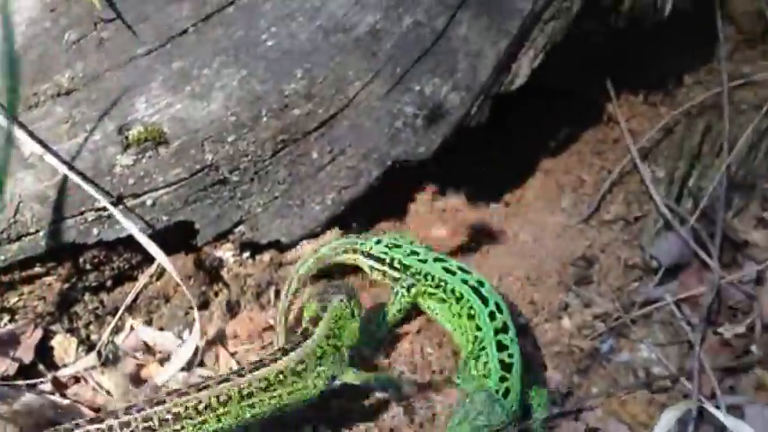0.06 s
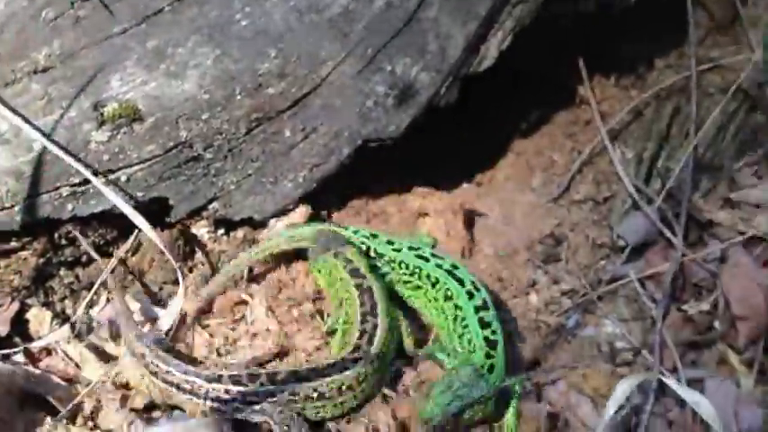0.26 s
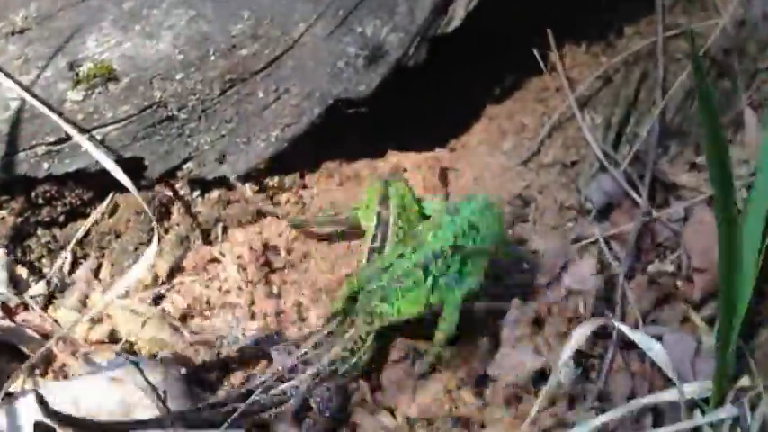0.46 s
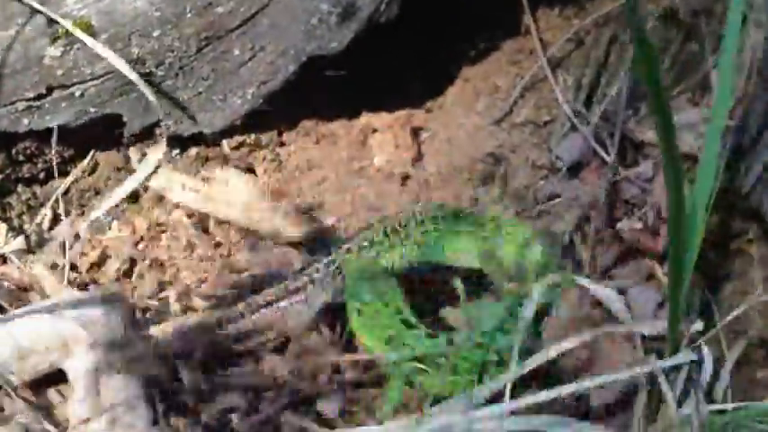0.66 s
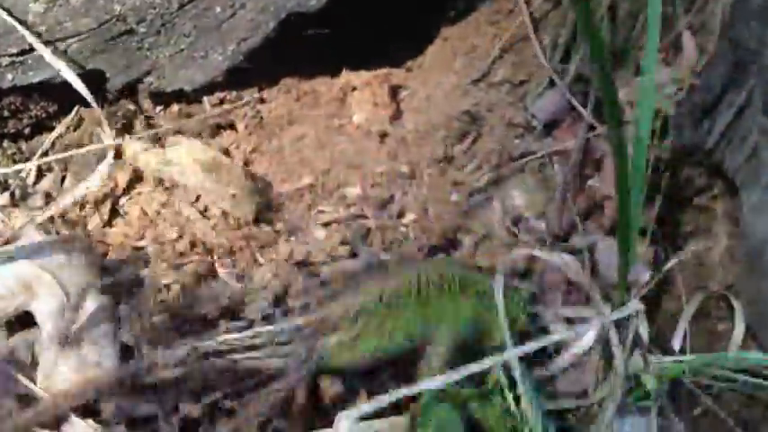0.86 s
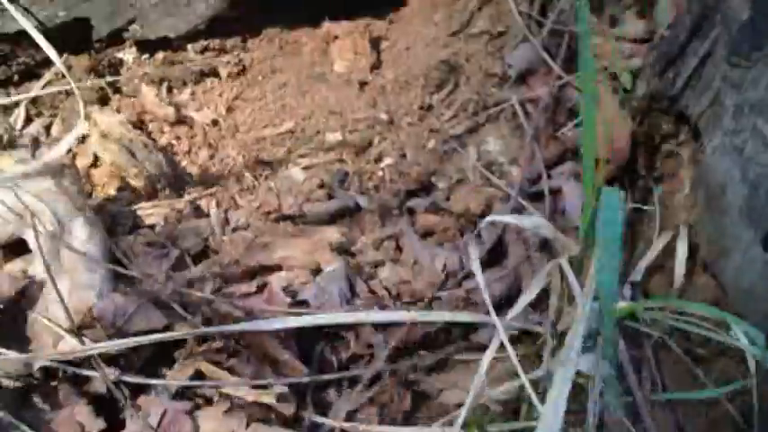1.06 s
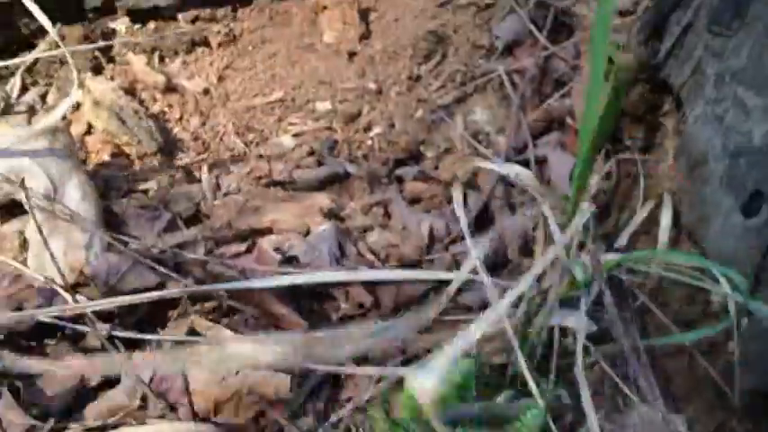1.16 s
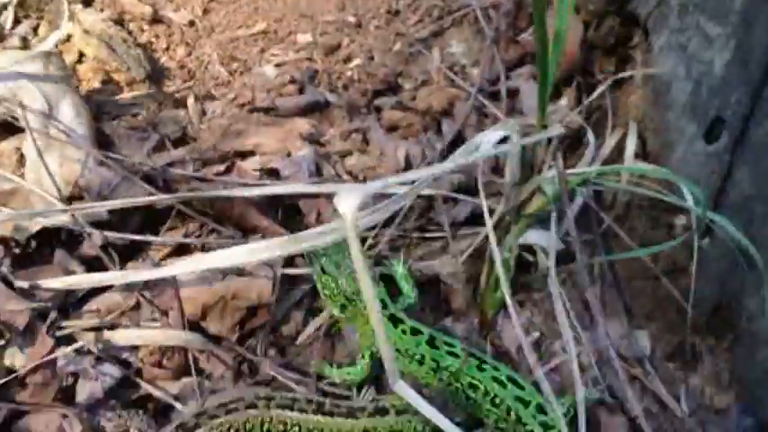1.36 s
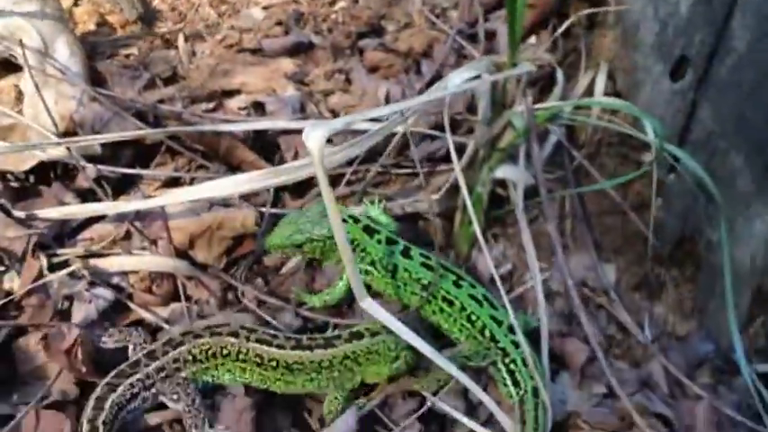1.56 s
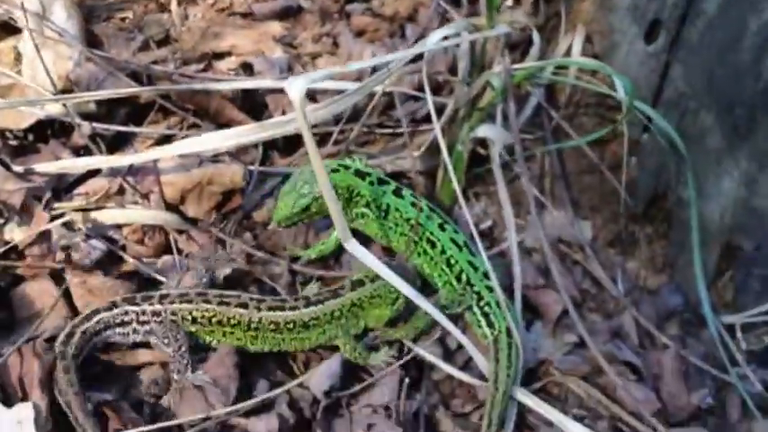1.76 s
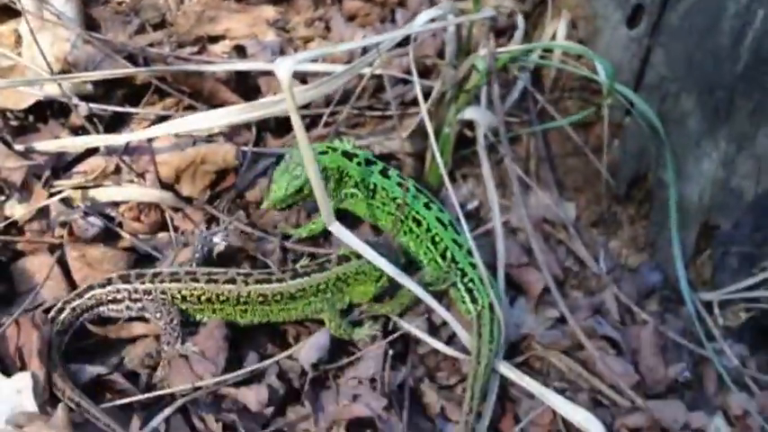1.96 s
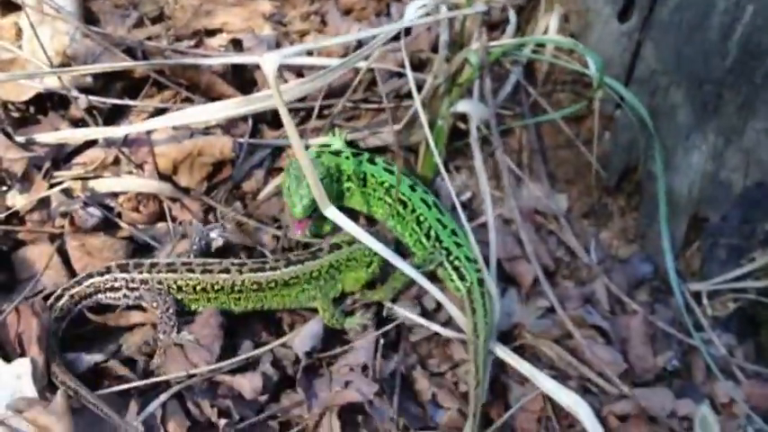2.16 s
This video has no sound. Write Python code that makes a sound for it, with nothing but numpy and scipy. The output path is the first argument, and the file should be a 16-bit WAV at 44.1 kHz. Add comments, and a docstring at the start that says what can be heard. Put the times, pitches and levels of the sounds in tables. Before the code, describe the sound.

Dry leaves rustle and crackle close by as two lizards scuffle in a quiet forest. Short, light shuffles fill the first 0.6 seconds. From about 0.6 to 1.1 seconds comes the loudest thrashing, a crisp, hissy crumpling with small snaps of leaves and stalks. Weaker rustles follow until 1.5 seconds, then only faint stirring and a few tiny ticks up to about 2.2 seconds.

```python
"""Dry leaf litter beside a log: two lizards scuffle close by, in mono, over still forest air.
They shuffle, thrash for half a second, then settle. Each kick crumples leaves (a spray of tiny
fractures over a sliding hiss) and scuffs the soil. Now and then a brittle leaf or stalk snaps;
once a body lands with a faint thud. Log and ground scatter a short echo."""
import sys
import numpy as np
from scipy import signal
from scipy.fft import rfft, irfft, next_fast_len
from scipy.io import wavfile
from scipy.ndimage import uniform_filter1d, map_coordinates

SR = 44100
rng = np.random.default_rng(int(sys.argv[2]) if len(sys.argv) > 2 else 0)


def generate_wav(signal):
    """Clip the signal to [-1, 1] and save it as 16-bit WAV at the path in sys.argv[1]."""
    frames = np.transpose(np.atleast_2d(signal))
    scaled = np.clip(frames, -1, 1) * 32767
    pcm = np.round(scaled).astype(np.int16)
    wavfile.write(sys.argv[1], SR, pcm)


N = 97020

# dry leaf spectrum (frequency [Hz], gain [dB])
LEAF_SPECTRUM = [(300, -46), (1200, -14.5), (2300, -12.5), (2750, -7.5), (3200, -4.5), (4100, -7),
                 (4800, -3), (5200, -4.5), (6300, -6), (7300, 1), (8500, -5), (9300, -.5), (10300, -6.5),
                 (11300, 0), (12500, -5.5), (13400, -3), (14200, -10.5), (15000, -23)]
# scuffed soil spectrum (frequency [Hz], gain [dB])
SOIL_SPECTRUM = [(25, -31), (70, -28.5), (130, -19.5), (300, -5.5), (600, -1), (1050, 2.5), (1900, -3),
                 (3000, -21), (8000, -22)]


def rustle():
    """Leaves crackle and slide in clumps; hard crushing merges fractures into hiss. Soil scuffs below."""
    # top treble (time [s], gain [dB])
    treble_curve = [(0, -5), (.45, -4.5), (.7, 1.5), (1, 1.5), (1.45, 1), (1.8, -4.5), (2.2, 3.5)]
    crackle_db, hiss_db, scuff_db = -2.5, -2, -18  # relative to the movement
    full_crush_db, max_merged_share, treble_hz = -27, .45, 8600
    on_leaves, on_soil = movement()
    clumps = unit(amp(1.24 * wobble(knots_per_s=190)))
    merged_share = max_merged_share * np.minimum(on_leaves / amp(full_crush_db), 1)
    hiss_gain = np.sqrt(amp(hiss_db) ** 2 + merged_share * amp(crackle_db) ** 2)
    hiss = hiss_gain * unit(coloured(rng.standard_normal(N), LEAF_SPECTRUM))
    crackle = amp(crackle_db) * np.sqrt(1 - merged_share) * crumple(LEAF_SPECTRUM)
    leaves = crackle + hiss
    treble = signal.sosfiltfilt(signal.butter(2, treble_hz, "high", fs=SR, output="sos"), leaves)
    leaves += (gain_curve(treble_curve) - 1) * treble
    scuff = amp(scuff_db) * crumple(SOIL_SPECTRUM)
    return clumps * (on_leaves * leaves + on_soil * scuff)


def movement():
    """Force envelopes on leaves and soil: stirring and kicks, summed in power."""
    # steady stirring (time [s], level [dB])
    stirring = [(0, -43), (.16, -44.5), (.195, -47), (.225, -40.5), (.27, -46.5), (.32, -51.5), (.41, -41),
                (.5, -43), (.56, -47.5), (.63, -42), (.76, -33.5), (.89, -35.5), (1.04, -31.5), (1.22, -49),
                (1.37, -40.5), (1.51, -56), (1.58, -55.5), (1.63, -59), (1.67, -53.5), (1.85, -51.5),
                (1.93, -64), (2.05, -68.5), (2.13, -57), (2.2, -65.5)]
    # kicks and tail sweeps (peak time [s], level [dB], rise [s], fade [s], soil weight [dB])
    kicks = [(.047, -30.5, 0.0016, 0.0063, 5.5), (0.093, -34.5, 0.0078, .005, -0.5),
             (.147, -36.5, .01, 0.0071, -10), (0.23, -34.5, 0.0085, 0.03, 2.5),
             (.255, -34.5, .006, 0.011, 3.5), (0.426, -31.5, 0.013, 0.028, -3.5),
             (0.574, -37, 0.0028, 0.012, -15), (.596, -37, 0.0063, 0.019, 1),
             (.640, -32.5, 0.0096, 0.039, -2), (.664, -27, 0.0099, 0.042, 0.5),
             (0.716, -24.5, 0.014, 0.025, -4.5), (0.739, -24.5, .01, .005, -5),
             (.826, -21.5, 0.0096, 0.0086, 1), (0.846, -29, 0.013, 0.015, 0.5),
             (.918, -31.5, 0.0077, 0.0039, 6), (0.938, -30, 0.01, 0.035, -4), (0.988, -28, 0.021, 0.027, 1),
             (1.039, -33, 0.021, .018, -4), (1.098, -28, 0.0078, 0.037, -6), (1.192, -41, 0.0076, .007, 5),
             (1.238, -37.5, .005, 0.017, 0.5), (1.255, -34.5, 0.017, 0.051, -1),
             (1.395, -39.5, 0.018, 0.028, -1.5), (1.473, -43.5, 0.006, 0.012, -16),
             (1.768, -51.5, 0.022, 0.035, 2), (1.826, -53, 0.02, 0.039, 6),
             (1.961, -50.5, 0.0044, 0.014, -7), (2.151, -50, .001, 0.0027, 6.5)]
    t = np.arange(N) / SR
    leaf_power = gain_curve(stirring) ** 2
    soil_power = leaf_power.copy()
    for peak_s, level_db, rise_s, fade_s, soil_db in kicks:
        swell = np.exp(-(np.minimum(t - peak_s, 0) / rise_s) ** 2)
        fade = np.exp(-np.maximum(t - peak_s, 0) / fade_s)
        kick = amp(level_db) * swell * fade
        leaf_power += kick ** 2
        soil_power += (kick * amp(soil_db)) ** 2
    return np.sqrt(leaf_power), np.sqrt(soil_power)


def crumple(spectrum):
    """A spray of fractures, many small and a few large, levelled to even power."""
    fractures_per_s, spread_db, window_s = 2200, 6, .015
    count = int(fractures_per_s * N / SR)
    times_s = rng.random(count) * N / SR
    peaks = amp(spread_db * np.minimum(rng.standard_normal(count), 2))
    ring_hz = rng.uniform(2435, 13600, count)
    grains = fractures(times_s, peaks, ring_hz, crack_s=.0004, ring_s=.00085, ring_gain=.59, samples=256)
    spray = coloured(grains, spectrum)
    window = int(window_s * SR)
    power = uniform_filter1d(uniform_filter1d(spray ** 2, window), window)
    return spray / np.sqrt(np.abs(power) + 1e-12)


def fractures(times_s, peaks, ring_hz, crack_s, ring_s, ring_gain, samples):
    """Each fracture: a sharp crack and a brief ring at its leaf's pitch, both decaying exponentially."""
    t = np.arange(samples) / SR
    cracks = rng.standard_normal((len(times_s), samples)) * np.exp(-t / crack_s)
    rings = ring_gain * np.sin(2 * np.pi * ring_hz[:, None] * t) * np.exp(-t / ring_s)
    grains = cracks + rings
    grains *= peaks[:, None] / np.abs(grains).max(axis=1, keepdims=True)
    indices = np.round(times_s * SR).astype(int)[:, None] + np.arange(samples)
    return np.bincount(indices.ravel(), grains.ravel(), N)[:N]


def snaps():
    """Single leaves and stalks break and knock the soil; larger, lower pieces ring longer and stronger."""
    # breaks (time [s], relative level [dB], ring [Hz])
    breaks = [(.046, -23, 3700), (.091, -17, 8160), (.1702, -21.5, 7000), (.2255, -21, 3900),
              (.252, -19, 7800), (.422, -39, 7000), (.4785, -22, 5500), (.527, -24, 8750),
              (.571, -24, 7400), (.6405, -20, 4900), (.690, -10, 4790), (.7392, -6, 9300),
              (.8255, -13, 7350), (.9495, -8, 7800), (.9935, -1.5, 11800), (1.098, -21, 9250),
              (1.172, -24, 7600), (1.238, -25, 13100), (1.3097, -15, 9300), (1.473, -20.5, 11900),
              (1.530, -33, 9300), (1.602, -33.5, 9400), (1.731, -30, 8100), (1.7652, -28, 9400),
              (1.779, -27, 7650), (1.959, -32, 8100), (2.1505, -30, 11500), (2.1525, -30, 11100),
              (2.1595, -34, 11600)]
    times_s, level_db, ring_hz = np.transpose(breaks)
    decay_cycles, reference_hz, knock_db = 10.7, 7450, -11
    ring_s = decay_cycles / ring_hz[:, None]
    ring_gain = .7 * (reference_hz / ring_hz[:, None]) ** .75
    grains = fractures(times_s, amp(level_db + .5), ring_hz,
                       crack_s=.00048, ring_s=ring_s, ring_gain=ring_gain, samples=512)
    return coloured(grains, LEAF_SPECTRUM) + amp(knock_db) * coloured(grains, SOIL_SPECTRUM)


def thud():
    """A light body lands on soft ground: one damped low tone."""
    onset_s, pitch_hz, level_db, decay_s = .821, 185, -52, .011
    age_s = np.maximum(np.arange(N) / SR - onset_s, 0)
    return amp(level_db) * np.sin(2 * np.pi * pitch_hz * age_s) * np.exp(-age_s / decay_s)


def echo(x):
    """Short diffuse scatter from log and ground."""
    level_db, t60_s, rise_s = -13.5, .058, .0021
    t = np.arange(SR // 3) / SR
    tail = rng.standard_normal(len(t)) * amp(-60 * t / t60_s) * (1 - np.exp(-t / rise_s))
    return amp(level_db) * signal.fftconvolve(x, tail / np.linalg.norm(tail))[:N]


def forest_air():
    """Still air: faint, steady, dark noise."""
    # air spectrum (frequency [Hz], gain [dB])
    air_spectrum = [(25, -39), (55, -15), (110, -4.5), (190, 5.5), (330, -3), (750, -0.5), (1500, -4.5),
                    (5000, -16.5), (14000, -36)]
    rms_db = -69.5
    return amp(rms_db) * unit(coloured(rng.standard_normal(N), air_spectrum))


def amp(db):
    """Decibels to gain."""
    return 10 ** (np.asarray(db) / 20)


def gain_curve(points):
    """Gain per sample through (time [s], level [dB]) points."""
    return amp(np.interp(np.arange(N) / SR, *np.transpose(points)))


def unit(x):
    """Scale to rms 1."""
    return x / np.sqrt(np.mean(x ** 2) + 1e-20)


def wobble(knots_per_s):
    """Smooth random curve."""
    return map_coordinates(rng.standard_normal(4096), [np.arange(N) * knots_per_s / SR], mode="wrap")


def coloured(x, spectrum):
    """Minimum-phase filter through (frequency [Hz], gain [dB]) points."""
    n_fft = 2 * next_fast_len(N // 2 + 4096)
    hz, db = np.transpose(spectrum)
    bin_hz = np.fft.rfftfreq(n_fft, 1 / SR)
    gain = amp(np.interp(np.log(bin_hz + 1), np.log(hz), db))
    cepstrum = irfft(np.log(gain))
    cepstrum[1:n_fft // 2] *= 2  # fold onto positive time: causal
    cepstrum[n_fft // 2 + 1:] = 0
    return irfft(rfft(x, n_fft) * np.exp(rfft(cepstrum)), n_fft)[:N]


def scene():
    """Scuffle, echo and air, identical in both channels."""
    litter = rustle() + snaps() + thud()
    air = forest_air()
    return np.tile(litter + echo(litter) + air, (2, 1))


def record(dry):
    """Brick-wall low-pass."""
    cutoff_hz = 15200
    n_fft = next_fast_len(N + SR // 2)
    passband = np.fft.rfftfreq(n_fft, 1 / SR) < cutoff_hz
    return irfft(rfft(dry, n_fft) * passband, n_fft)[:, :N]


dry = scene()
out = record(dry)
generate_wav(out)
```